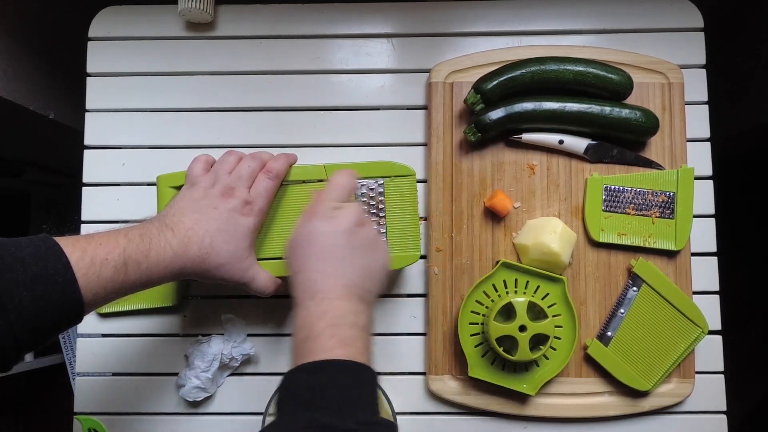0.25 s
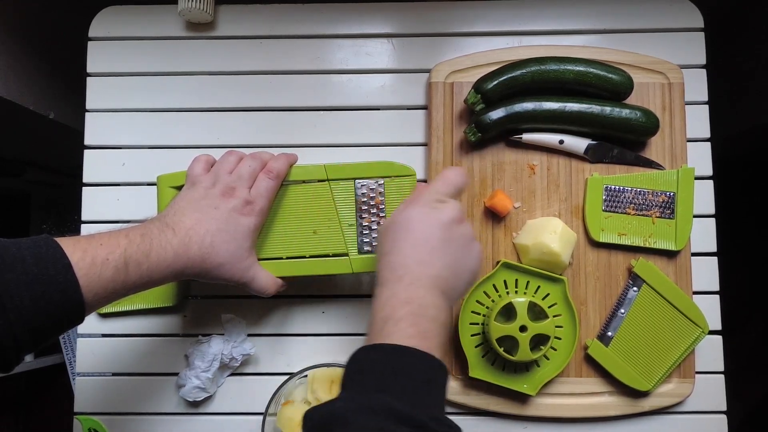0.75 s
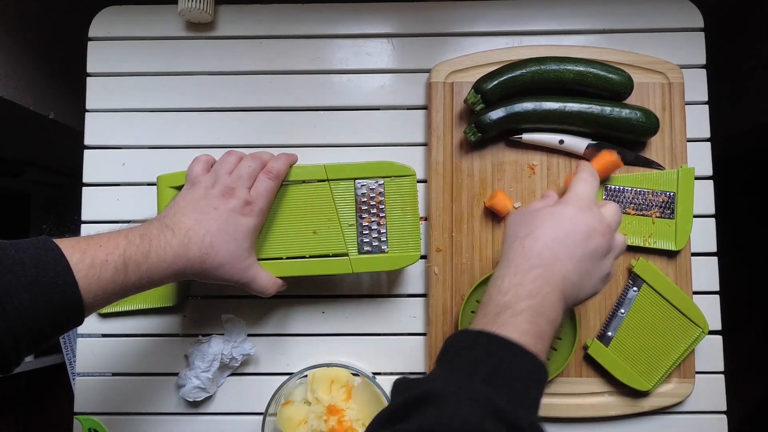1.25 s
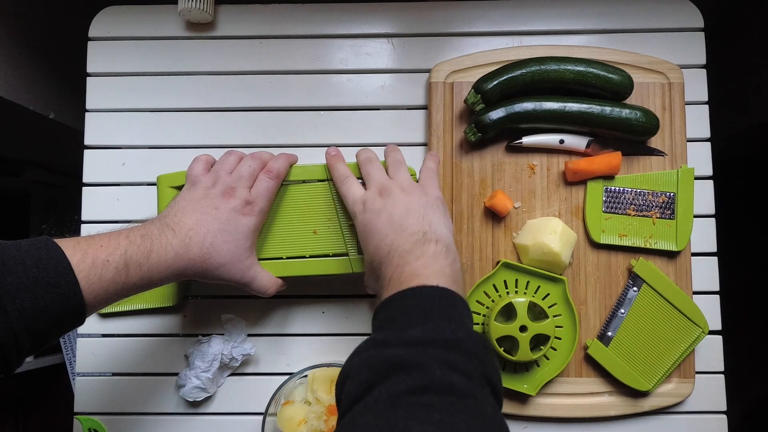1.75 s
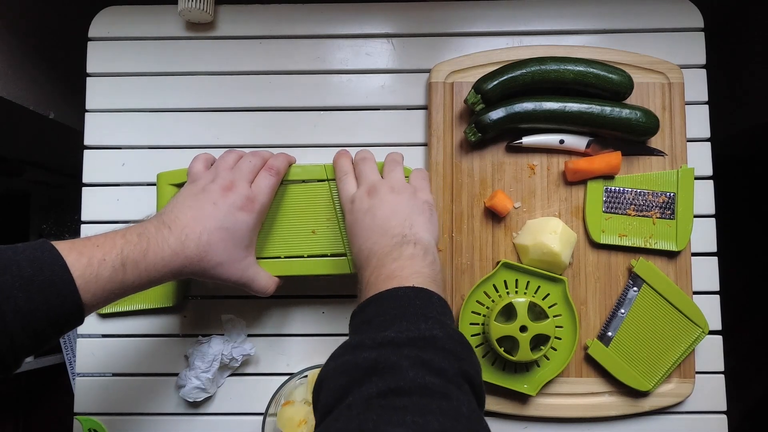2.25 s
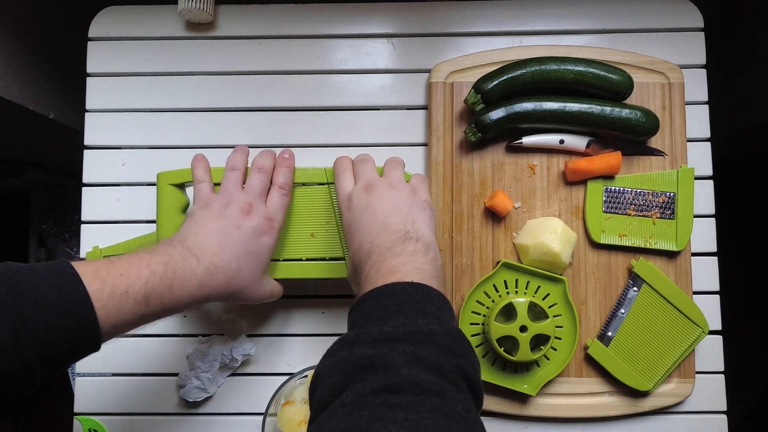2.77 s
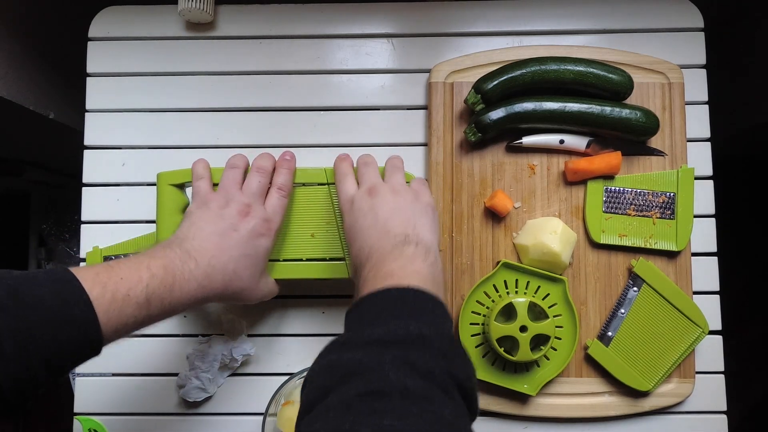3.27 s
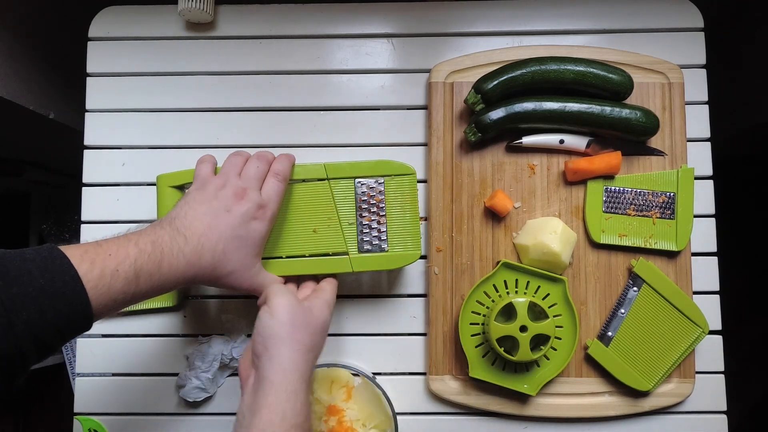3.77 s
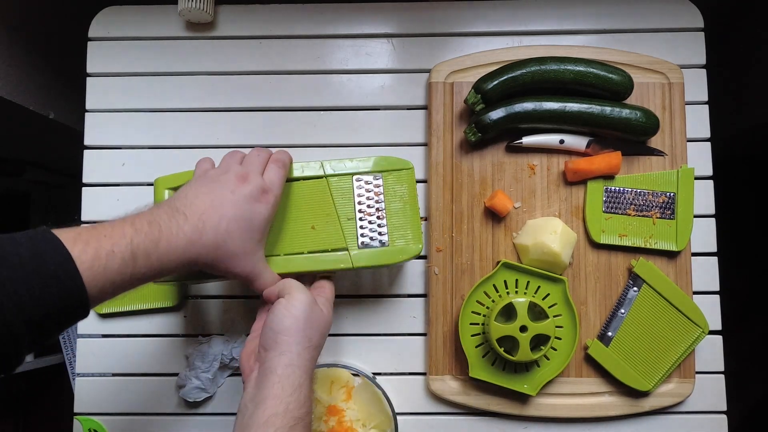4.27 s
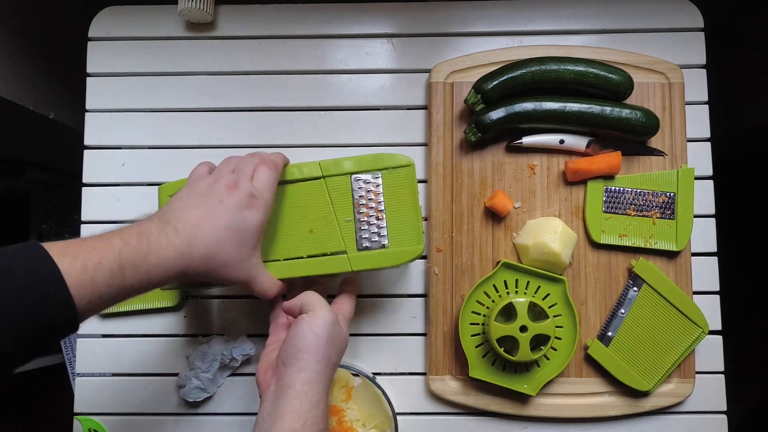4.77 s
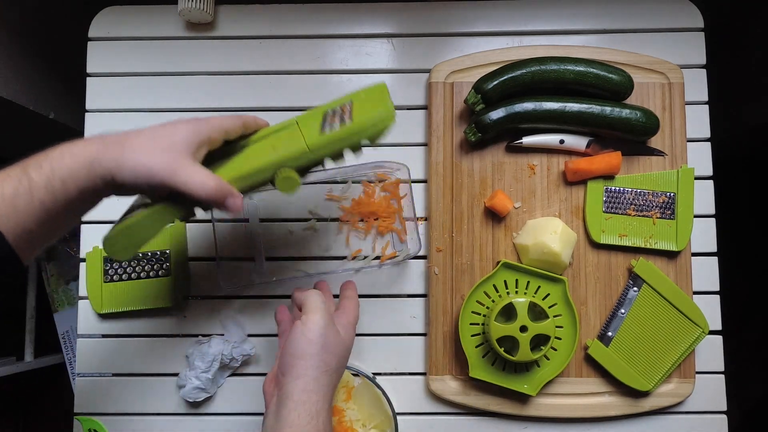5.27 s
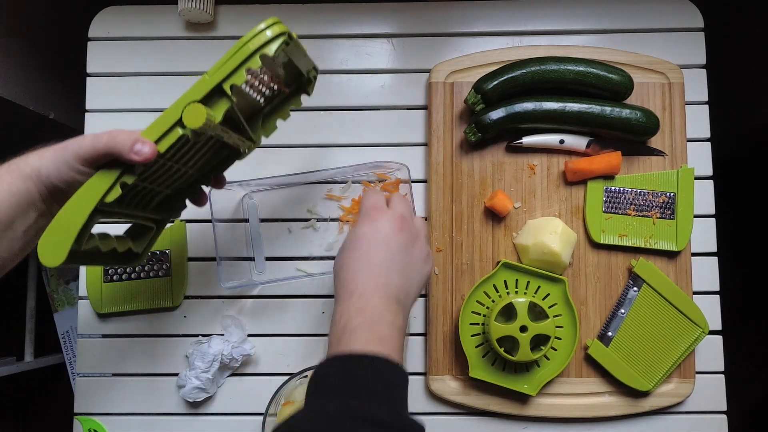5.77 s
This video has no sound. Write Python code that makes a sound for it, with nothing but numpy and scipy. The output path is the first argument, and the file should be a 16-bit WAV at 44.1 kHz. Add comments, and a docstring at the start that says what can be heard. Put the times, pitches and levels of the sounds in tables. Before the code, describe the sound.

In a small, quiet kitchen, a carrot is rasped twice over the steel teeth of a plastic slicer, then drops on a wooden board and rolls to rest. The blade insert creaks and knocks as it is pressed home. The hollow catch box judders over the table and bumps about, and the slicer comes off it with a snap. It is heard from above, with short wall echoes and faint room air.

```python
"""A small, quiet kitchen, heard from above. A carrot is rasped twice over the steel teeth of a plastic
slicer, tearing with a hiss, then drops on a wooden board and rolls to rest. The blade insert creaks as
it is pressed home. The catch box under the slicer judders over the table in stick-slip and knocks about,
and the slicer is pulled off it with a snap. Each blow rings the modes of deck, box or board.
Behind it all: short wall echoes, faint air and a thin electronic whine."""
import sys
import numpy as np
from scipy import signal
from scipy.io import wavfile
from scipy.ndimage import uniform_filter1d

SR = 44100
rng = np.random.default_rng(int(sys.argv[2]) if len(sys.argv) > 2 else 0)


def transcribe(u):
    """Save the signal u as a 16-bit wav file named by the first command-line argument.

    u: samples, shape (n,) or (channels, n), limited to [-1, 1]; the rate is SR.
    q: integer samples, one column per channel.
    """
    v = np.clip(np.atleast_2d(u).T, -1, 1)
    q = np.round(v * 32767).astype(np.int16)
    wavfile.write(sys.argv[1], SR, q)


N = 265583
T = np.arange(N) / SR
HIT_T = T[:SR * 3 // 4]   # time axis of one blow
ATTACK_SAMPLES = SR * 3 // 100
TREBLE_PAN_DB = [[-1.06], [1.06]]   # left, right


# Each row: set-down in seconds, bite in seconds, cut length in seconds, force in dB, hiss in dB.
STROKES = [(0.1804, 0.2438, 0.021, -31, -35), (0.5315, 0.6048, 0.027, -26, -36)]
# Slicer deck. Each row: mode in Hz, level in dB, T60 in seconds.
DECK_MODES = [(116.3, -32, 1), (177, -15.5, 0.16), (234, -15.5, 0.13), (307.5, -7, 0.13), (357.3, 5, 0.04),
              (397.2, 6.5, 0.045), (459.4, 0.5, 0.076), (509.2, -5, 0.076), (542, -19, 0.18),
              (696, -31, 0.25), (875.4, -18, 0.24), (933.7, -3.5, 0.1), (955, -12.5, 0.093),
              (984, -31.5, 0.22), (1295, -33, 0.34), (1640, -29, 0.12)]
# Tearing carrot. Each row: frequency in Hz, density in dB.
TEAR_SPECTRUM = [(150, -79), (600, 39), (1200, -16), (2000, 15.5), (2900, 15), (4000, 12), (8000, 12),
                 (12000, 8), (16000, 9)]

def rasp(cut_delay_s=0.029, rise_s=0.043, fall_s=0.041, push_db=-29, blade_hz=965):
    """Steel teeth tear the carrot: dense breaks hiss, shake the deck and ring the blade plate."""
    breaks = grains(per_s=2200, spread_db=3.2)
    push, tear = np.zeros((2, N))
    for _, bite_s, length_s, _, hiss_db in STROKES:
        start = bite_s + cut_delay_s
        end = start + length_s
        contact = np.interp(T, [start - rise_s, start, end, end + fall_s], [0, 1, 1, 0])
        push += from_db(push_db) * contact
        tear += from_db(hiss_db) * contact
    hiss = tear * crackle(breaks, smooth_hz=283) * noise(TEAR_SPECTRUM) * from_db(TREBLE_PAN_DB)
    blade = from_db(-4) * push * unit_rms(resonate(breaks, blade_hz, widths_hz=[100, 330]))
    return drive(push * breaks, DECK_MODES) + blade + hiss


def stroke_knocks():
    """The carrot knocks the deck twice a stroke: when set down and on meeting the teeth."""
    rows = []
    for down_s, bite_s, _, force_db, _ in STROKES:
        rows.append((down_s, force_db + 1, 374, force_db - 5.5, force_db - 22))
        rows.append((bite_s, force_db + 4, 376, force_db - 17, force_db - 21.5))
    return blows(rows, DECK_MODES, thump_width_hz=250, shake_db=-18, ring_db=7,
                 rise_s=0.0036, edge_hz=12000, t60_s=0.16)


# Each row: start in seconds, thump in dB, thump centre in Hz, clack in dB.
BOUNCES = [(1.1815, -40, 287, -43), (1.217, -28.5, 377, -42), (1.240, -30.5, 370, -44),
           (1.2645, -33.5, 420, -34), (1.292, -33.5, 427, -37.5), (1.338, -37, 295, -44),
           (1.367, -41, 390, -36), (1.4673, -73, 396, -50), (1.549, -52.5, 352, -54.5)]
# Board and table top. Each row: mode in Hz, level in dB, T60 in seconds.
BOARD_MODES = [(147, -22.5, 0.063), (182, -13, 0.5), (227, 5.5, 0.051), (301, 0, 0.16), (375, 0, 0.086),
               (424, 18.5, 0.01), (455, -13.5, 0.57), (540, -3, 0.17), (712, -7, 0.13), (978, -4, 0.21),
               (1048, -8.5, 0.26)]

def tumbling_carrot(first_tick_db=-50, loss_db_per_s=78):
    """The carrot lands among the tools on the board; each bounce ticks more softly as it slows."""
    landing_s = BOUNCES[0][0]
    rows = [(*row, first_tick_db - loss_db_per_s * (row[0] - landing_s)) for row in BOUNCES]
    return blows(rows, BOARD_MODES, thump_width_hz=245, shake_db=-40, ring_db=-4.5,
                 rise_s=0.0017, edge_hz=2400, t60_s=0.2)


# Carrot on steel. Each row: frequency in Hz, density in dB.
SKID_SPECTRUM = [(70, -28.5), (170, -15), (600, -7), (1300, 4), (2500, 1.5), (3200, 2), (4200, 4),
                 (5500, -5), (8500, -2.5), (10000, 1.5), (12000, -13.5), (16000, -13)]

def rolling_carrot():
    """The carrot skids over a spare grating insert and rolls to rest on the board."""
    sliding = from_db(-41) * swell(1.2, 1.25, rise_s=0.072, fall_s=0.18)
    rolling = from_db(-30) * swell(1.235, 1.235, rise_s=0.098, fall_s=0.76)
    skid = scrape(sliding, SKID_SPECTRUM, per_s=4500)
    return skid + friction(rolling, BOARD_MODES, per_s=2400, scuff_db=-16.5, lowpass_hz=4000)


# Each row: start in seconds, thump in dB, thump centre in Hz, clack in dB, tick in dB.
DECK_KNOCKS = [(0.001, -42, 402, -44.5, -53.5), (0.6385, -32, 430, -33.5, -49.5),
               (1.879, -55, 377, -63, -73), (1.9425, -78, 453, -64, -81), (1.972, -48.5, 336, -58.5, -83),
               (2.272, -53.5, 400, -73, -92), (2.288, -21, 370, -33.5, -46.5),
               (2.527, -49, 540, -52.5, -70), (2.941, -63.5, 490, -78, -89), (3.214, -52.5, 408, -58, -70),
               (3.2465, -35, 417, -40.5, -59.5), (3.2814, -45, 487, -45.5, -69),
               (3.4255, -42, 510, -51, -79)]

def deck_knocks():
    """Handling knocks ring the slicer's plastic deck."""
    return blows(DECK_KNOCKS, DECK_MODES, thump_width_hz=246, shake_db=-30, ring_db=1.5,
                 rise_s=0.0072, edge_hz=5000, t60_s=0.11)


# Each row: start in seconds, thump in dB, thump centre in Hz, clack in dB, tick in dB.
BOX_BUMPS = [(3.874, -22.5, 555, -35.5, -35.5), (3.884, -20, 307, -30, -58), (3.9212, -44, 396, -29, -37.5),
             (4.123, -63, 500, -58, -78), (4.234, -51.5, 448, -66, -113),
             (4.3135, -32.5, 575, -35.5, -54.5), (4.378, -50, 445, -63, -68), (4.394, -44, 440, -57, -65),
             (4.411, -43, 510, -37, -47.5), (4.4225, -25, 583, -24, -47), (4.440, -26, 356, -32, -47),
             (4.478, -36, 530, -40.5, -60), (4.645, -47.5, 420, -70, -73), (4.669, -55, 520, -54, -68),
             (4.6995, -36, 643, -42, -54), (4.762, -47, 466, -71, -86)]
# Each row: mode in Hz, level in dB, T60 in seconds.
COVERED_BOX_MODES = [(180.5, -17.5, 0.23), (233, -24.5, 0.17), (310.3, -0.5, 0.11), (369, -10, 0.14),
                     (390, 13, 0.018), (441, -20.5, 0.18), (496, -7, 0.094), (547.3, -5, 0.11),
                     (691.4, -14, 0.17), (816.6, -1, 0.064), (868, -7.5, 0.1), (952, -13, 0.21),
                     (1081, -13, .22), (1110, -17, .15), (1168, -21, .17), (1305, -19, .12),
                     (1459, -20, .15), (1768, -25, .13), (2356, -27, 0.14), (2795, -26, 0.059),
                     (3150, -50, .1)]

def box_bumps():
    """The catch box bumps about and rings with the slicer on top."""
    return blows(BOX_BUMPS, COVERED_BOX_MODES, thump_width_hz=212.6, shake_db=-23.5, ring_db=0,
                 rise_s=0.0034, edge_hz=5600, t60_s=0.13)


# Each row: start in seconds, thump in dB, thump centre in Hz, clack in dB, tick in dB.
SNAPS = [(5.0735, -31.5, 368, -38.5, -63), (5.078, -19, 317, -36, -39), (5.096, -26.5, 316, -33.5, -37)]
# Each row: mode in Hz, level in dB, T60 in seconds.
OPEN_BOX_MODES = [(108.5, -31, .3), (178, -12, 0.62), (228, -7, 0.077), (243, -15.5, 0.5),
                  (301, -7.5, 0.37), (349.4, -7.5, 0.41), (372.8, 2, 0.13), (424, -5, 0.16),
                  (618, -27, 0.345), (847, -20, 0.24), (1077, -24, 0.25), (1307, -12.5, 0.081),
                  (1512, -26, 0.12), (1706, -13.5, 0.078), (2530, -36, 0.22), (3900, -35, .25),
                  (5300, -26.5, 0.11)]

def snap_off():
    """The slicer snaps free and the open box rings."""
    return blows(SNAPS, OPEN_BOX_MODES, thump_width_hz=212.6, shake_db=-19.5, ring_db=-3,
                 rise_s=0.0021, edge_hz=8200, t60_s=0.12)


# Each row: start in seconds, end in seconds, first and last rate in slips per second, level in dB.
BOX_DRAGS = [(3.726, 3.775, 315, 200, -31.5), (3.806, 3.867, 186, 175, -31)]

def box_judder(jitter=0.05, uneven_db=0.5, hollow_hz=345):
    """The dragged box sticks and slips in slowing jerks, heard through its hollow and through the slicer deck
    on top."""
    drags = np.array(BOX_DRAGS)
    per_s = np.interp(T, drags[:, :2].ravel(), drags[:, 2:4].ravel())
    wobble = unit_rms(uniform_filter1d(rng.standard_normal(N), SR // 200))
    slip_count = np.floor(np.cumsum(per_s * (1 + jitter * wobble)) / SR)
    slips = np.diff(slip_count, prepend=0) * from_db(uneven_db * rng.standard_normal(N))
    pull = sum(from_db(db) * swell(start, end, rise_s=0.037, fall_s=0.051)
               for start, end, _, _, db in BOX_DRAGS)
    groan = resonate(slips, hollow_hz, widths_hz=[250, 305])
    groan /= np.sqrt(uniform_filter1d(groan ** 2, ATTACK_SAMPLES) + 1e-12)   # hold rms at 1
    deck_force = pull * (unit_rms(slips) + grains(per_s=300, spread_db=-1.5))
    deck_ring = from_db(-11) * drive(deck_force, DECK_MODES)
    return butter(pull * groan, "low", 540, order=4) + butter(deck_ring, "low", 1100)


# Each row: start in seconds, end in seconds, scrape in dB, creak in dB.
INSERT_PRESSES = [(2.425, 2.508, -52.5, -45), (2.645, 2.697, -56, -61), (2.772, 2.795, -62.5, -64.5)]
# Insert in its seat. Each row: frequency in Hz, density in dB.
SEAT_SPECTRUM = [(50, -40), (100, -13), (130, 1.5), (190, 1), (450, -0.5), (680, 0.5), (980, -7.5),
                 (1400, -16.5), (2200, -26.5), (3500, -15), (5000, -29.5), (8000, -24), (16000, -34)]

def blade_insert(creak_hz=450):
    """Each push scrapes the insert in its seat; quick plastic-on-plastic slips make the deck creak."""
    scraping, creaking = np.zeros((2, N))
    for start, end, scrape_db, creak_db in INSERT_PRESSES:
        pressure = swell(start, end, rise_s=0.047, fall_s=0.33)
        scraping += from_db(scrape_db) * pressure
        creaking += from_db(creak_db) * pressure
    slips = grains(per_s=720, spread_db=4.5)
    creak = unit_rms(resonate(slips, creak_hz, widths_hz=[130, 210]))
    return scrape(scraping, SEAT_SPECTRUM, per_s=2900) + creaking * creak


# Each row: peak time in seconds, level in dB.
SLICER_SHIFTS = [(0.0, -42), (0.349, -39), (0.831, -51), (0.93, -57), (2.1, -78), (2.40, -51), (2.63, -50),
                 (3.2, -55), (3.861, -36), (4.271, -53.5), (4.47, -41.5), (4.692, -45.5), (4.8, -63),
                 (5.45, -60.5)]

def shifting_slicer(grip_db=-69.5, grip_until_s=5, rise_s=0.22, fall_s=0.41):
    """The slicer rubs on its box: faintly under the hand's grip, more with each shift."""
    grip = from_db(grip_db) * swell(0, grip_until_s, rise_s, fall_s)
    shifts = [from_db(db) * swell(peak_s, peak_s, rise_s, fall_s) for peak_s, db in SLICER_SHIFTS]
    level = np.max([grip, *shifts], axis=0)
    return friction(level, DECK_MODES, per_s=1700, scuff_db=-5.5, lowpass_hz=586)


# Each row: start in seconds, pitch in Hz, level in dB, T60 in seconds.
DRY_TICKS = [(3.063, 2390, -53, 0.028)]

def dry_tick():
    """A small tick: one fast-dying sine."""
    out = np.zeros(N)
    for start_s, hz, db, t60_s in DRY_TICKS:
        add(out, start_s, ringing([(hz, db, t60_s)]))
    return out


# Plastic rattle, contact tick, table shake. Each row: frequency in Hz, density in dB.
RATTLE_SPECTRUM = [(100, -70), (300, 13), (600, 1.5), (950, 7.5), (1300, 0.5), (2000, -13.5), (3000, -38),
                   (5000, -81), (9000, -74)]
TICK_SPECTRUM = [(200, -39), (1000, -41), (2000, 12.5), (3200, 9), (5000, 6), (8000, 8), (12000, 6.5),
                 (16000, 15.5)]
SHAKE_SPECTRUM = [(20, 6.5), (45, -5.5), (80, -25.5), (130, -1), (220, -4), (500, -44.5)]

def blows(rows, modes, thump_width_hz, shake_db, ring_db, rise_s, edge_hz, t60_s):
    """Each blow: a low-mode thump, a clack of rattle and high modes, a contact tick, a table shake."""
    textures = np.array([noise(RATTLE_SPECTRUM),
                         noise(TICK_SPECTRUM) * from_db(TREBLE_PAN_DB),
                         noise(SHAKE_SPECTRUM)])
    give = 1 - np.exp(-HIT_T / rise_s)   # the yielding body takes a few ms to move
    out = np.zeros((2, N))
    for start_s, thump_db, thump_hz, clack_db, tick_db in rows:
        offset = rng.integers(N - len(HIT_T))
        rattle, tick, shake = textures[..., offset:offset + len(HIT_T)]
        body = give * ringing(modes, spread_db=3)
        thump = resonate(body, thump_hz, [thump_width_hz])
        rattle = at_level(rattle * np.sqrt(give) * fade(HIT_T, t60_s), 0)
        clack = rattle + at_level(butter(body, "high", 750, order=4), ring_db)
        cutoff_hz = edge_hz * 2 ** ((tick_db + 36.5) / 54.5)   # harder contacts tick brighter
        tick = butter(tick * fade(HIT_T, 1.09 * t60_s), "low", cutoff_hz)
        shake = shake * fade(HIT_T, 0.22)
        add(out, start_s, at_level(thump, thump_db) + at_level(clack, clack_db)
            + at_level(tick, tick_db) + at_level(shake, thump_db + shake_db))
    return out


# Each row: frequency in Hz, density in dB.
SCUFF_SPECTRUM = [(100, -41), (400, 4), (900, -0.5), (1400, -9), (2200, -18.5), (3500, -27.5), (7000, -22),
                  (16000, -38)]

def friction(level, modes, per_s, scuff_db, lowpass_hz):
    """Small catches between two surfaces scuff and, softened by the contact, ring the body."""
    catches = grains(per_s, spread_db=0)
    force = level * butter(catches, "low", lowpass_hz, order=1)
    scuff = level * crackle(catches, smooth_hz=92) * noise(SCUFF_SPECTRUM)
    return drive(force, modes) + from_db(scuff_db) * scuff


def scrape(level, spectrum, per_s):
    """Small edges catch on a sliding surface, making the noise flutter."""
    return level * crackle(grains(per_s, spread_db=3), smooth_hz=250) * noise(spectrum)


def ringing(modes, spread_db=0):
    """A body's answer to one tap; spread_db varies each mode as the place of the tap would."""
    return sum(from_db(db + spread_db * rng.normal()) * np.sin(2 * np.pi * hz * HIT_T) * fade(HIT_T, t60)
               for hz, db, t60 in modes)


def drive(force, modes):
    """A running force rings a small body, which radiates little bass."""
    body = butter(ringing(modes), "high", 150, order=4)
    return signal.fftconvolve(force, body / np.linalg.norm(body))[:N]


def grains(per_s, spread_db):
    """Random tiny impulses; rms 1."""
    sizes = from_db(spread_db * np.minimum(rng.exponential(1, N), 4))
    return unit_rms(sizes * rng.choice([-1, 1], N) * (rng.random(N) < per_s / SR))


def crackle(force, smooth_hz):
    """The loudness flutter of a train of grains."""
    pole = np.exp(-2 * np.pi * smooth_hz / SR)
    return unit_rms(np.sqrt(signal.lfilter([1 - pole], [1, -pole], force ** 2 + 1e-12)))


# Each row: frequency in Hz, density in dB.
ECHO_SPECTRUM = [(40, -14), (150, -2), (400, -2.5), (1000, 0), (3000, -1), (8000, -0.5), (16000, 4.5)]
# Each row: frequency in Hz, T60 in seconds.
ECHO_T60_S = [(100, 0.87), (300, 0.34), (1000, 0.39), (4000, 0.43), (13000, 0.23)]

def wall_echoes(x, first_echo_s=0.00073, build_s=0.0016):
    """Diffuse echoes from near walls, dying sooner in the treble."""
    onset = np.clip((HIT_T - first_echo_s) / build_s, 0, 1)
    tail = onset * noise(ECHO_SPECTRUM, len(HIT_T), ECHO_T60_S)
    tail /= np.sqrt(np.sum(tail ** 2) / 2)
    return signal.fftconvolve(x, tail, axes=1)[:, :N]


# Each row: frequency in Hz, density in dB.
AIR_SPECTRUM = [(25, -26), (60, -14), (95, -19.5), (125, -5.5), (220, -2), (330, -1), (600, -17),
                (1000, -17), (2000, -20), (5000, -22), (10000, -21.5), (16000, -22)]

def room_tone(air_db=-62, whine_db=-76.5, whine_hz=15720):
    """Faint room air and a thin electronic whine."""
    whine = np.sqrt(2) * np.sin(2 * np.pi * whine_hz * T)
    return from_db(air_db) * noise(AIR_SPECTRUM) + from_db(whine_db) * whine


# Each row: frequency in Hz, side minus mid in dB.
STEREO_WIDTH = [(30, -23), (120, -25.5), (280, -15), (500, -16.5), (1000, -10), (2000, -0.5), (5000, 0.5),
                (14000, 0.5)]

def noise(spectrum, size=N, t60_table=None):
    """Stereo noise in half-octave bands, wider in the treble; with t60_table each band decays."""
    edges_hz = np.geomspace(20, 18000, 21)
    white = rng.standard_normal((2, 2, size + len(HIT_T) // 4))
    out = np.zeros((2, size))
    for k, (low, high) in enumerate(zip(edges_hz, edges_hz[1:])):
        hz = np.sqrt(low * high)
        mid, side = butter(white[k % 2], "band", [low, high])[:, -size:]
        width = from_db(at_hz(STEREO_WIDTH, hz))
        stereo = (mid + width * side * [[1], [-1]]) / np.hypot(1, width)
        decay = fade(T[:size], at_hz(t60_table, hz)) if t60_table else 1
        out += from_db(at_hz(spectrum, hz)) * stereo * decay
    return unit_rms(out)


def resonate(x, hz, widths_hz):
    """Band-pass resonances in series, one per width."""
    for width_hz in widths_hz:
        r = np.exp(-np.pi * width_hz / SR)
        x = signal.lfilter([1 - r, 0, r - 1], [1, -2 * r * np.cos(2 * np.pi * hz / SR), r * r], x)
    return x


def butter(x, kind, hz, order=2):
    """Maximally flat filter."""
    return signal.sosfilt(signal.butter(order, hz, kind, fs=SR, output="sos"), x)


def swell(start_s, end_s, rise_s, fall_s):
    """Holds 1 from start to end; rise and fall each span 60 dB."""
    return fade(np.maximum(start_s - T, 0), rise_s) * fade(np.maximum(T - end_s, 0), fall_s) + 1e-9


def fade(t, t60_s):
    """Exponential decay."""
    return np.exp(-np.log(1000) * t / t60_s)


def from_db(db):
    """Decibels to gain."""
    return 10 ** (np.asarray(db) / 20)


def unit_rms(x, count=N):
    """Scale the first count samples to rms 1."""
    return x / np.sqrt(np.mean(x[..., :count] ** 2) + 1e-20)


def at_level(x, db):
    """Scale a blow so that its attack has this rms level."""
    return from_db(db) * unit_rms(x, ATTACK_SAMPLES)


def at_hz(table, hz):
    """Read a table on a log-frequency axis."""
    freqs, values = np.transpose(table)
    return np.interp(np.log(hz), np.log(freqs), values)


def add(out, start_s, sound):
    """Mix a sound in at start_s."""
    i = round(start_s * SR)
    out[..., i:i + sound.shape[-1]] += sound[..., :N - i]


def scene(echo_db=-7.5):
    """The work at the table, its echoes and the room tone."""
    carrot = rasp() + stroke_knocks() + tumbling_carrot() + rolling_carrot()
    slicer = deck_knocks() + blade_insert() + shifting_slicer()
    box = box_bumps() + snap_off() + box_judder()
    work = carrot + slicer + box + dry_tick()
    return work + from_db(echo_db) * wall_echoes(work) + room_tone()


def record(dry, low_cut_hz=105, high_cut_hz=15900):
    """The microphone thins the bass; the top is cut steeply."""
    thin = butter(dry, "high", low_cut_hz)
    return signal.sosfilt(signal.ellip(12, .1, 80, high_cut_hz, fs=SR, output="sos"), thin)


dry = scene()
out = record(dry)
transcribe(out)
```